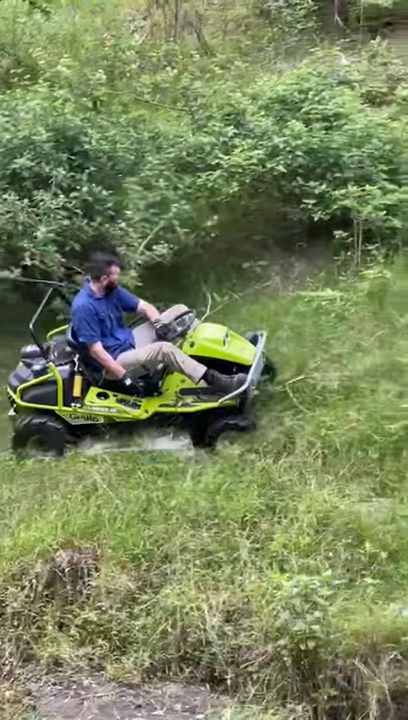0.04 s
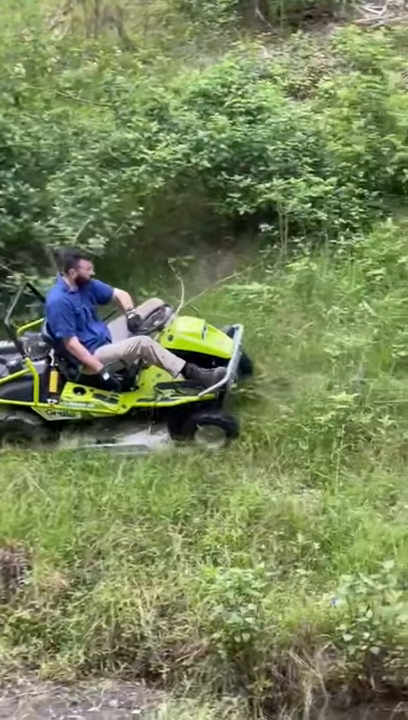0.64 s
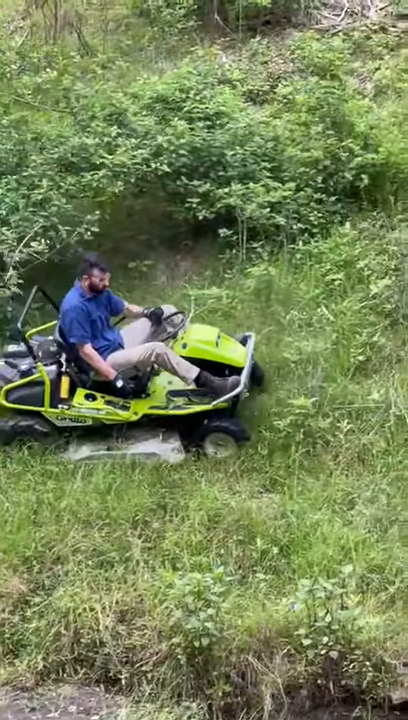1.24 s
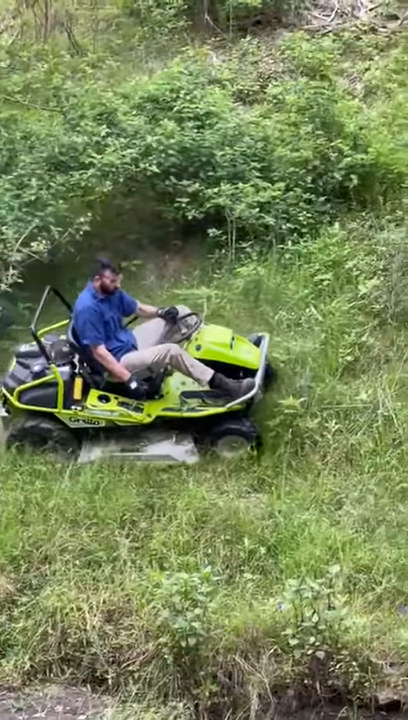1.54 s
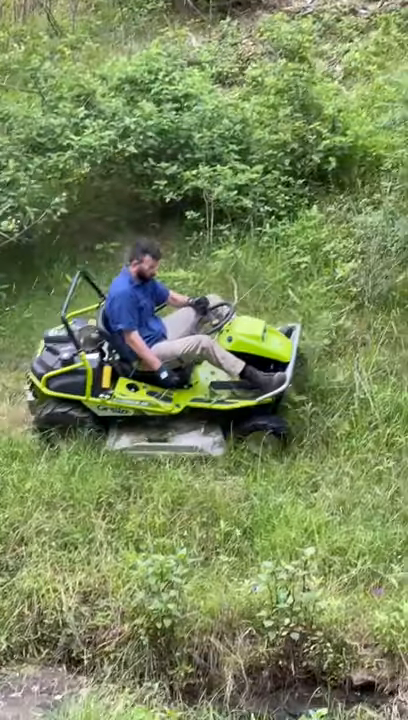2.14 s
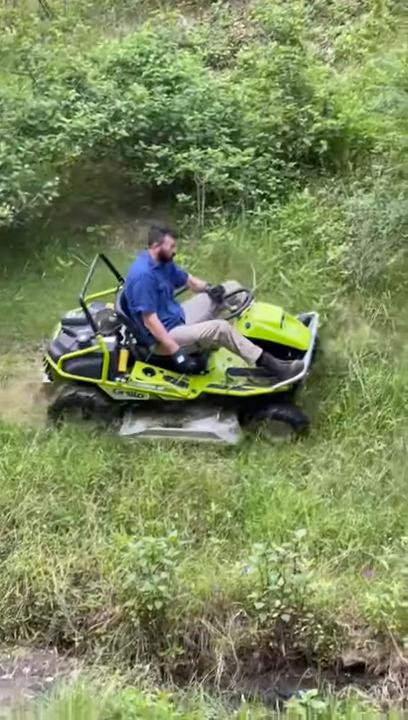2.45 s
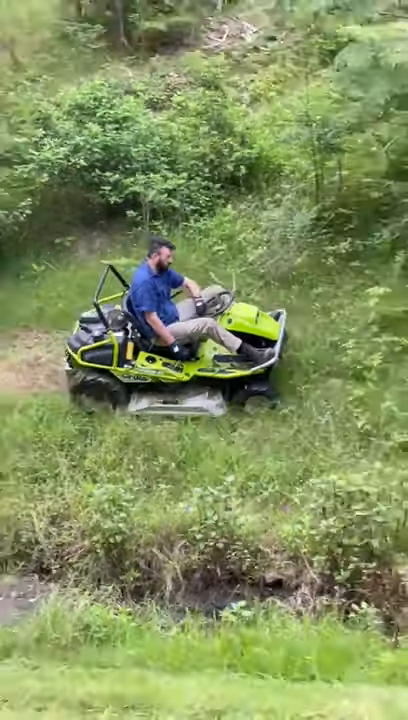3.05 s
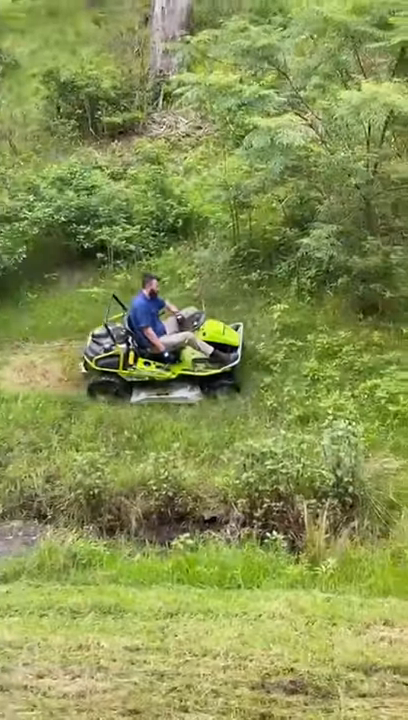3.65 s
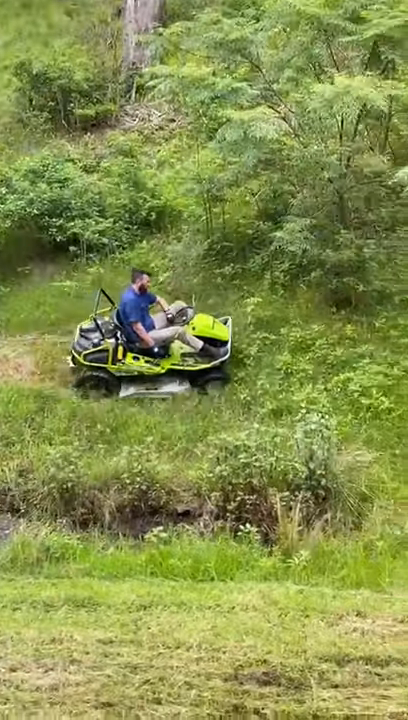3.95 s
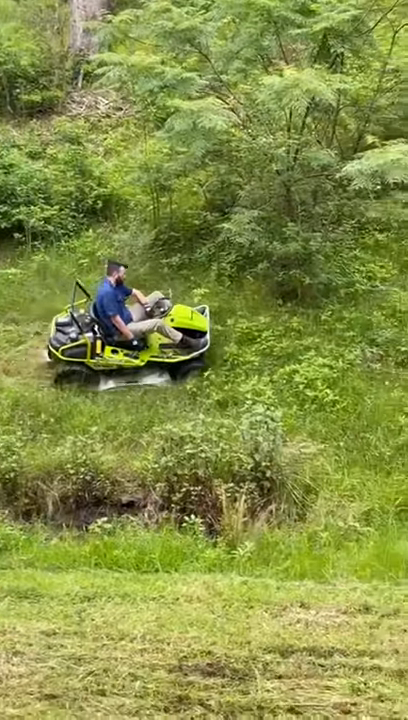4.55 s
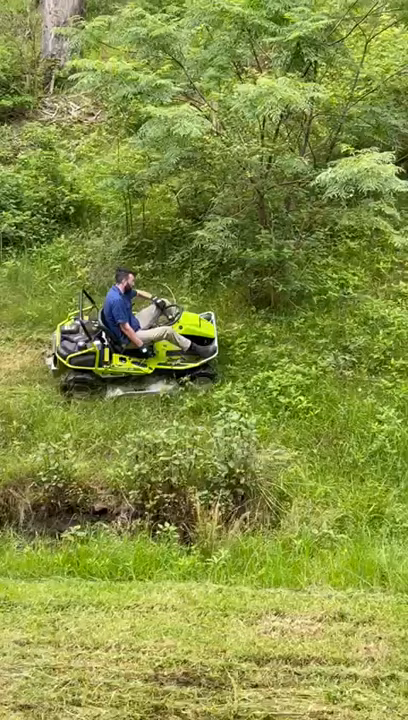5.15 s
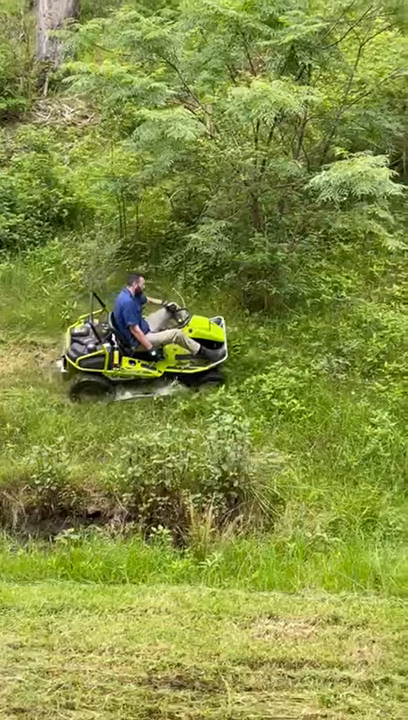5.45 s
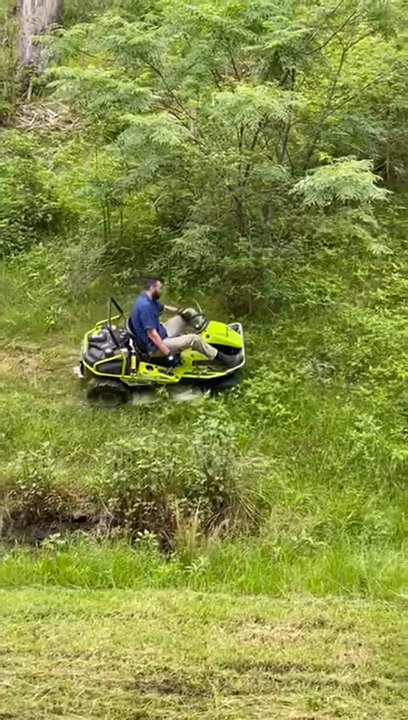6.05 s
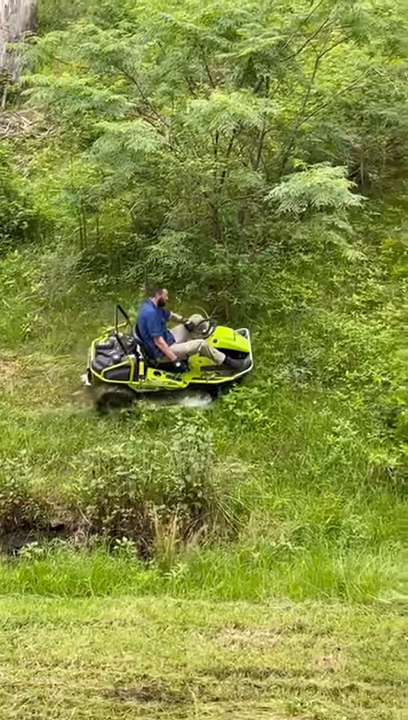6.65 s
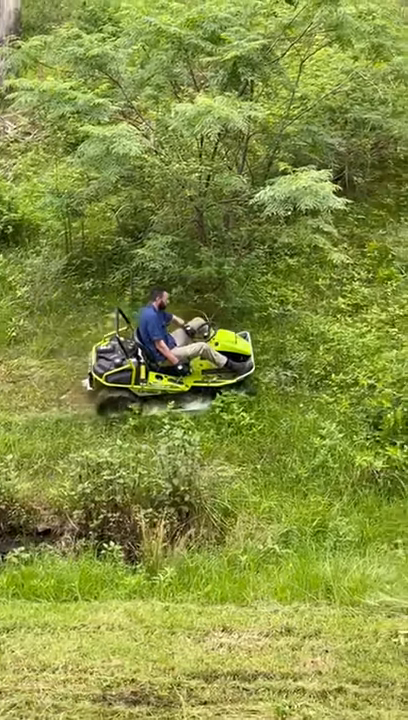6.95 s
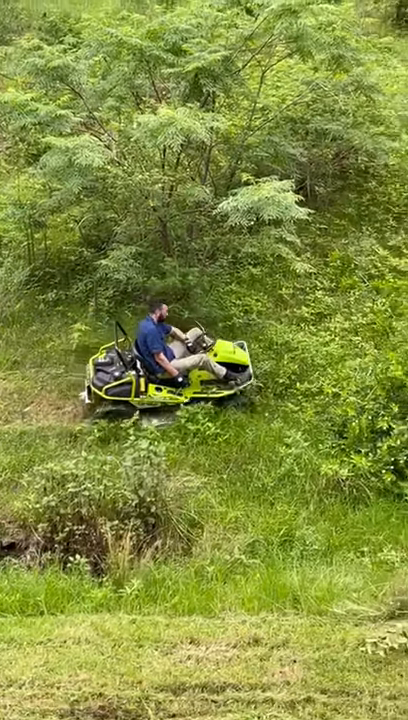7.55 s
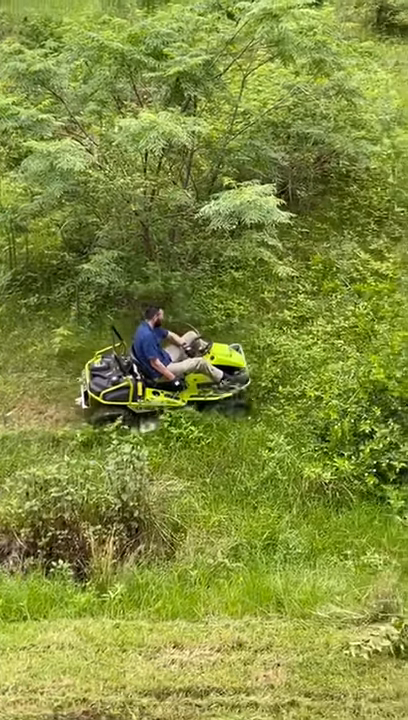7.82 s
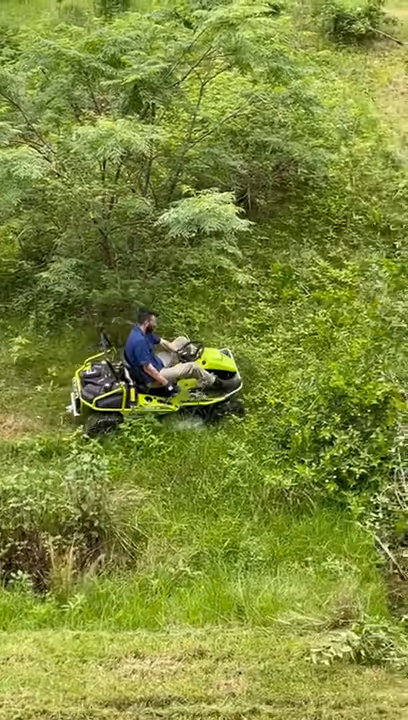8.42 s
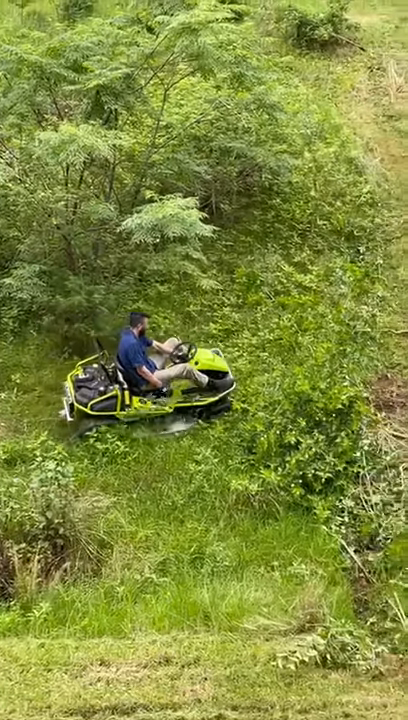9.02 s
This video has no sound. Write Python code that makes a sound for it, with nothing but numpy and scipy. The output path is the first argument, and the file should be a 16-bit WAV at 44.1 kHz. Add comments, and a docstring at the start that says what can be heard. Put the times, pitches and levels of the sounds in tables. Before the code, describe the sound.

A ride-on mower drones steadily some way off, hissing through long grass while sticks crack and clatter in its steel deck.

```python
"""A bank of rough grass, some way off: a ride-on slasher mows, its V-twin governed near full speed.
The exhaust drones; the belt-driven blade hums and booms in its steel deck. Cut stalks hiss and
crackle, sticks snap and clatter, clumps ring the deck, and the blade chops through woody stems.
In thick growth the engine sags a little. The echo off the slope cancels a shifting low band."""
import sys
import numpy as np
from scipy import signal
from scipy.fft import rfft, irfft
from scipy.io import wavfile
from scipy.ndimage import uniform_filter1d

SR = 44100
rng = np.random.default_rng(int(sys.argv[2]) if len(sys.argv) > 2 else 0)


def log_audio(samples):
    """Write samples as a 16-bit WAV file to the path given in sys.argv[1]."""
    # one column per channel
    frames = np.atleast_2d(samples).T
    # limit to full scale, then quantise
    limited = np.clip(frames, -1, 1)
    pcm = np.round(limited * 32767).astype(np.int16)
    wavfile.write(sys.argv[1], SR, pcm)


N = 409248
TIME_S = np.arange(N) / SR
FREQS_HZ = np.maximum(np.arange(N // 2 + 1) * SR / N, 1)

# Engine speed. Each row: time in seconds, four-stroke cycles per second.
CYCLE_RATE_HZ = [(0, 27.75), (.8, 27.42), (1.17, 26.8), (1.7, 27.98), (2.2, 27.73), (3.15, 27.66),
                 (3.45, 27.39), (3.85, 27.75), (4.3, 27.74), (4.55, 28.0), (5.3, 27.76), (5.75, 28.0),
                 (6.4, 28.12), (7.0, 28.04), (7.55, 28.19), (8.4, 27.92), (9.28, 27.72)]
# Grass load on the blade. Each row: time in seconds, load in dB over ordinary mowing.
LOAD_DB = [(0, -3), (.7, -1), (.9, 4), (1.4, -1), (1.9, 1), (2.65, 0), (3.2, 3.5), (3.55, 2), (4.2, 0),
           (4.45, -2), (4.75, -2), (5.1, -3), (7.2, -1.5), (7.55, -1.5), (8.3, -1), (9.28, -1.5)]
# Harmonics. Each row: multiple of the cycle or turning rate, base level in dB.
ENGINE_HARMONICS = [(2, -28), (3, -37.5), (4, -46), (5, -27.5), (6, -32.5), (7, -50), (8, -37), (10, -41.5),
                    (11, -52.5), (13, -41), (14, -63), (17, -52), (18, -51), (19, -64), (20, -47),
                    (21, -70), (23, -39), (24, -54.5), (32, -43), (36, -75), (38, -44), (39, -49),
                    (48, -59)]
BLADE_HARMONICS = [(1, -43.5), (2, -36), (3, -42), (4, -42.5), (6, -45.5), (12, -53), (21, -59), (22, -42)]
# Level curves. Each row: time in seconds, base level in dB.
WHINE_DB = [(0, -35), (1.24, -28.5), (1.8, -33), (3, -30.5), (3.82, -26.5), (4.21, -26.5), (4.52, -30),
            (5.3, -30.5), (5.8, -27), (6.5, -24.5), (8.7, -26), (9.28, -23.5)]  # engine's singing tone
RUSH_DB = [(0, -27), (1.9, -26), (2.5, -26.5), (3.5, -25), (4.4, -25), (9.28, -25)]  # exhaust and cooling air
BOOM_DB = [(0, -38), (.76, -38), (.88, -22.5), (1.05, -29), (1.18, -25), (1.45, -35), (2.55, -38),
           (2.88, -27), (3.0, -28.5), (3.27, -23), (3.5, -27), (3.75, -30), (4.25, -27.5), (4.45, -38),
           (8.4, -40), (9.28, -27.5)]  # deck filling with grass
HISS_DB = [(0.0, -39.5), (0.33, -37), (0.77, -39), (0.95, -32.5), (1.32, -37), (2.4, -36.5), (3.41, -33.5),
           (3.77, -37), (3.98, -35), (4.83, -37), (5.06, -38), (6.12, -38), (6.25, -35.5), (6.74, -37),
           (7.49, -36.5), (9.28, -39)]  # cut grass
# Air resonance under the deck. Each row: time in seconds, centre in Hz, level in dB.
DECK_CAVITY = [(0, 540, -30), (.78, 536, -37), (.88, 525, -24), (1.0, 547, -38), (2.1, 590, -36),
               (2.5, 600, -28), (2.85, 590, -33), (3.2, 586, -28.5), (3.45, 570, -26.5), (3.65, 570, -27.5),
               (4.1, 557, -32), (4.4, 569, -38), (9.28, 560, -39)]
# Steel deck modes. Each row: frequency in Hz, width in Hz, relative gain in dB.
STEEL_MODES = [(560, 240, 7), (1043, 45, 0), (1467, 30, -7.5), (2110, 79, -1.5), (2290, 65, -20)]

# Noise colours. Each row: frequency in Hz, relative density in dB.
RUMBLE_SPECTRUM = [(15, -3), (28, 7), (42, -9), (70, 26), (110, 15), (200, 25), (260, 3), (400, -65.5)]  # stirred air
RUSH_SPECTRUM = [(150, -7.5), (250, -7), (350, -0.5), (430, -1), (510, 4), (630, -0.5), (740, -5.5),
                 (900, -4.5), (1100, -5.5), (1350, -9), (1800, -13), (3000, -20), (8000, -57)]
THRASH_SPECTRUM = [(400, 6), (900, -3), (1550, 7.5), (1800, 2.5), (2400, 3), (2850, -3), (3150, -0.5),
                   (3650, -1.5), (4450, 1), (5500, -7.5), (11000, -59)]  # stalks in the deck
HISS_SPECTRUM = [(1500, -45), (3500, -20), (4500, -1), (5900, 4), (7000, 2), (8500, -7.5), (9500, 4),
                 (10500, 11.5), (11100, 7), (11700, -18), (13000, -108)]
FRACTURE_SPECTRUM = [(1500, -26), (3500, -26), (6000, 22.5), (8500, 20), (10500, 34.5), (12000, 10)]  # a stick's first tick
CRACK_SPECTRUM = [(900, -20), (2000, 8), (2800, 7.5), (3400, 6.5), (4400, 11.5), (6000, 6), (7500, 1),
                  (8800, 5), (10500, 10), (12500, -47)]
KNOCK_SPECTRUM = [(250, -21), (550, -2.5), (780, -1), (1050, 2.5), (1600, 3.5), (2200, 0.5), (3200, -1.5),
                  (6000, -41)]
BITE_SPECTRUM = [(700, -22), (1500, 13), (2800, 6.5), (4400, 1), (6500, 2), (8500, -6), (10800, 8.5),
                 (12000, -20)]
STALK_SPECTRUM = [(1500, -5), (3000, -9), (5500, 0.5), (7500, -1), (9000, 4), (10800, 11.5), (12000, -16)]

# Dry stalks parting. Each row: start in seconds, base level in dB.
DRY_STALKS = [(0.045, -20.5), (.278, -27), (0.298, -20), (.404, -23), (.425, -20), (.517, -21), (.756, -22),
              (0.854, -23), (.969, -19), (.997, -25), (1.098, -25), (1.345, -27), (1.797, -23),
              (1.816, -24), (4.127, -23), (4.184, -14), (4.29, -19), (4.597, -21.5), (4.754, -20),
              (4.852, -20), (5.635, -20), (6.065, -20), (6.201, -24), (6.219, -27), (6.279, -20),
              (6.297, -25), (6.355, -22), (6.98, -21.5), (7.352, -26), (8.187, -26), (8.235, -23),
              (8.638, -22)]
# Louder sticks. Each row: start in seconds, base level in dB, tumbling time in seconds,
# knock offset in dB, tick offset in dB, strongest ring in Hz, ring gain in dB.
STICK_HITS = [(0.334, -18.5, .003, -13, -12, 2850, 9), (.358, -12.5, 0.011, -8, -22, 2800, 8),
              (.478, -7.5, 0.0085, -9, -20, 4050, -1), (0.734, -20, .003, -20, -6, 2820, 13),
              (.774, -14.5, .003, -20, -9, 2860, 10), (.795, -18.5, .005, -1, -5, 2830, 8),
              (.809, -18.5, .006, -1, -14, 2830, 5), (.832, -19, .004, 1, -10, 2800, 14),
              (.873, -16, 0.0088, 1.5, -14, 2930, 6), (.892, -18.5, .004, 3, -14, 2830, 8),
              (.912, -26, 0.0052, 10.5, -20, 2850, 4), (.9547, -21, .004, -14, -14, 2830, 5),
              (.984, -16, 0.012, -3, -10, 2830, 0), (1.0784, -18, .005, -10, -12, 2820, 8),
              (1.1368, -14.5, .005, -18, -24, 2820, 2), (1.1653, -20.5, .012, -11, -23, 2820, 15),
              (1.192, -22, .004, 5, -22, 2800, 12), (1.279, -17.5, .0087, -2, -20, 3950, 1),
              (1.491, -18.5, 0.0033, -10, -8, 2730, 6), (1.915, -26, 0.0055, 10.5, -18, 2820, 8),
              (2.122, -12, 0.0049, -11, -30, 4030, 5), (2.898, -20, .005, 3, -5, 2520, 2),
              (3.072, -20.5, 0.0092, -6, -20, 2890, 17), (3.2027, -14, .006, -5, -19, 4400, 7),
              (3.498, -24, .0046, 8, -8, 2620, 4), (3.7588, -12, .003, -2.5, -9, 6500, -4),
              (3.861, -13, 0.015, 2.5, -21, 2260, 6), (3.926, -9.5, 0.0057, -4, -24, 3530, 2),
              (3.984, -23, .004, -1, -14, 3400, 0), (4.086, -19, .0044, -4, -16, 2840, 8),
              (4.162, -15.5, 0.0036, 3.5, -22, 2580, 10), (4.191, -15, .005, 5, -14, 2290, 16),
              (4.296, -12.5, 0.0017, 0, -9, 2650, 16), (4.694, -20.5, .002, 4, -9, 3000, 5),
              (4.715, -27, 0.0023, 6, -12, 2940, 4), (4.943, -23.5, .004, -1, -16, 2830, 5),
              (6.3751, -19.5, .0035, -5, -1, 2680, -1), (6.39, -23, .005, -5, -12, 2800, 0),
              (8.883, -17, 0.0096, 1, -11, 2590, -5)]
# Heavy clumps. Each row: start in seconds, lowest ring in Hz, its peak in dB, upper rings' base in dB.
CLUMP_HITS = [(.874, 525, -13.5, -31), (.912, 538, -14, -14), (1.283, 604, -15, -22),
              (3.864, 625, -15, -22), (4.193, 615, -26, -19.5), (8.886, 534, -24, -27)]
# Woody stems. Each row: start in seconds, length in seconds, base level in dB.
WOODY_STEMS = [(0.053, 0.6, -26.5), (1.446, 0.45, -24.5), (2.697, 0.41, -24), (4.575, 0.36, -20),
               (6.139, 0.27, -27), (7.208, 0.59, -24), (7.754, 0.89, -31)]

# Notch from the slope's echo. Each row: time in seconds, centre in Hz, depth from 0 to 1.
SLOPE_NOTCH = [(0, 213, 1), (.8, 223, 0.56), (1.4, 214, .4), (2.4, 228, 0.3), (2.9, 390, 0.4),
               (3.5, 365, 0.5), (4.2, 319, 0.17), (6.3, 242, 0.6), (8, 295, 0.26), (9.28, 308, 0.4)]
# Port balance. Each row: frequency in Hz, left minus right in dB.
PORT_BALANCE_DB = [(250, 0), (455, .7), (560, 2.9), (800, 3.3), (1150, 4.0), (1400, 1.8), (1650, 0),
                   (12000, 0)]
# Port phase. Each row: frequency in Hz, left lead in radians.
PORT_LEAD_RAD = [(2200, 0), (2800, .45), (3500, .3), (4100, .72), (4550, 1.7), (4870, 3.14), (5250, 5.7),
                 (5550, 6.28), (6550, 6.3), (7400, 7.5), (7750, 8.0), (8100, 9.3), (9600, 9.45),
                 (10900, 11), (11200, 11.55), (11600, 11.9), (12000, 11.2)]
# Phase flutter and scatter. Each row: frequency in Hz, base depth in dB against the steady sound.
PORT_FLUTTER_DB = [(60, -42), (200, -31), (420, -24), (900, -24), (1900, -28), (2800, -16), (3600, -17),
                   (4500, -14), (4870, -26), (5200, -15), (5900, -28), (7400, -14), (8800, -32),
                   (10500, -17)]
# Midrange swing. Each row: time in seconds, extra left minus right in dB.
SWING_DB = [(0, 0), (3.9, -0.5), (4.4, 3.5), (4.6, 3), (4.9, 6), (5.4, 6.5), (5.65, -0.5), (6.3, -1),
            (6.8, 0), (9.28, -1)]
# Band that swings. Each row: frequency in Hz, share from 0 to 1.
SWING_BAND = [(460, 0), (620, 1), (850, 0.82), (1200, 0.77), (1400, 0.3), (1550, 0)]

BELT_RATIO = 1.832  # blade turns per engine cycle
DECK_RING_HZ = 2740  # steel under flying debris


def from_db(db):
    """Decibels to gain."""
    return 10 ** (np.asarray(db) / 20)


def unit_rms(x):
    """Scale to rms 1."""
    return x / np.sqrt(np.mean(x ** 2) + 1e-20)


def over_time(rows):
    """A curve's value columns at every sample."""
    times_s, *columns = np.transpose(rows)
    return [np.interp(TIME_S, times_s, column) for column in columns]


def over_hz(rows):
    """A table's value at every FFT bin."""
    hz, value = np.transpose(rows)
    return np.interp(np.log(FREQS_HZ), np.log(hz), value)


def coloured(x, spectrum):
    """Apply a spectrum; white input keeps its power."""
    return irfft(rfft(x) * unit_rms(from_db(over_hz(spectrum))), N)


def white():
    """White noise, rms 1."""
    return rng.standard_normal(N)


def drift(rate_hz, step=40):
    """Smooth random wander, rms 1."""
    r = np.exp(-2 * np.pi * step * rate_hz / SR)
    noise = rng.standard_normal(N // step + 2002)
    slow = signal.lfilter([1], [1, -2 * r, r * r], noise)[2000:]
    return np.interp(np.arange(N) / step, np.arange(len(slow)), unit_rms(slow))


def resonator(hz, width_hz):
    """Two-pole band-pass coefficients, peak gain 1."""
    r = np.exp(-np.pi * width_hz / SR)
    return np.array([1, 0, -1]) * (1 - r * r) / 2, [1, -2 * r * np.cos(2 * np.pi * hz / SR), r * r]


def resonate(x, hz, width_hz):
    """Steady resonance."""
    return signal.lfilter(*resonator(hz, width_hz), x)


def moving_resonance(x, hz, width_hz, block=512):
    """Resonance centred on the curve hz."""
    band, state = np.zeros(N), np.zeros(2)
    for i in range(0, N, block):
        band[i:i + block], state = signal.lfilter(*resonator(hz[i], width_hz), x[i:i + block], zi=state)
    return band


def evened(x, window=6000):
    """Level slow swells, keep the quick throb; rms 1."""
    return x / np.sqrt(uniform_filter1d(x ** 2, window) + 1e-20)


def puffs(turns, duty):
    """One smooth swell per turn, about duty turns long."""
    return np.exp(-(np.sin(np.pi * turns) / (np.pi * duty)) ** 2)


def tones(turns, harmonics, waver_db, jitter_turns):
    """Harmonics of a rotation with wavering levels and shared timing jitter."""
    turns = turns + jitter_turns * drift(9.6)
    out = np.zeros(N)
    for order, db in harmonics:
        amplitude = np.sqrt(2) * from_db(db + waver_db * drift(3.7))
        out += amplitude * np.sin(2 * np.pi * (order * turns + rng.random()))
    return out


def blow(start_s, rise_s, t60_s, hold_s=0):
    """Sample span and envelope of an impact: rise, hold, decay."""
    start = int(start_s * SR)
    age_s = TIME_S[:min(SR // 2, N - start)]
    rise = 1 - np.exp(-age_s / rise_s)
    decay = from_db(-60 * np.maximum(age_s - hold_s, 0) / t60_s)
    return slice(start, start + len(age_s)), rise * decay


def snaps(per_s, spread_db):
    """Random snapping impulses, a few much louder; rms 1."""
    sizes = from_db(spread_db * np.minimum(rng.exponential(1, N), 4)) * rng.choice([-1, 1], N)
    return unit_rms(sizes * (rng.random(N) < per_s / SR))


def slope_echo(x):
    """The echo off the slope cancels a low band that shifts as the mower drives on."""
    hz, depth = over_time(SLOPE_NOTCH)
    return x - depth * moving_resonance(x, hz, width_hz=60)


def stereo_ports(x, flutter_hz=60, sway_db=-3, scatter_db=-2):
    """Two microphone ports: steady level difference, fluttering phase, faint scatter off foliage."""
    half_balance = from_db(over_hz(PORT_BALANCE_DB) / 2)
    flutter = from_db(over_hz(PORT_FLUTTER_DB))
    _, fade = blow(0, rise_s=0.0027, t60_s=0.048)
    echoes = rng.standard_normal((2, len(fade))) * fade / np.sqrt(np.sum(fade ** 2))
    response = np.array([half_balance, np.exp(-1j * over_hz(PORT_LEAD_RAD)) / half_balance])
    ports = rfft(x) * response / np.sqrt(1 + flutter ** 2)
    ports *= 1 + from_db(scatter_db) * flutter * rfft(echoes, N)
    # a quadrature share advances one port and delays the other
    sway = from_db(sway_db) * unit_rms(np.tanh(2 * drift(flutter_hz))) * np.array([[1], [-1]])
    return irfft(ports, N) + sway * irfft(1j * flutter * ports, N)


def swing_left(ports, left_share=0.44, lag_rad_per_db=0.11):
    """For a while the midrange grows on the left, fades and lags on the right."""
    swing_db, = over_time(SWING_DB)
    band = signal.hilbert(irfft(rfft(ports) * over_hz(SWING_BAND), N))
    left = from_db(left_share * swing_db)
    right = from_db((left_share - 1) * swing_db) * np.exp(-1j * lag_rad_per_db * swing_db)
    return ports + np.real(band * (np.array([left, right]) - 1))


def stalk_ticks(gain_db=1.5):
    """Each dry stalk parts in one short, bright burst."""
    envelope = np.zeros(N)
    for start_s, db in DRY_STALKS:
        span, fade = blow(start_s, rise_s=0.00018, t60_s=0.02, hold_s=0.001)
        envelope[span] += fade * from_db(db + gain_db)
    return coloured(white() * envelope, STALK_SPECTRUM)


def stems(bites_per_s=50.8, spread_db=0.5, ring_db=2, gain_db=1):
    """A woody stem feeds in, one bite per blade turn: a dry rattle that swells and fades."""
    envelope = np.zeros(N)
    for start_s, length_s, db in WOODY_STEMS:
        for age_s in np.arange(0, length_s, 1 / bites_per_s):
            span, fade = blow(start_s + age_s, rise_s=0.00063, t60_s=0.028)
            feed = np.sqrt(np.sin(np.pi * age_s / length_s))
            envelope[span] += fade * feed * from_db(db + gain_db + spread_db * rng.standard_normal())
    bites = white() * envelope
    ring = from_db(ring_db) * resonate(bites, DECK_RING_HZ, width_hz=77)
    return coloured(bites + ring, BITE_SPECTRUM)


def clumps(soft_hz=1250):
    """Clumps ring the deck; packed grass shifts the lowest mode and damps those above soft_hz."""
    out = np.zeros(N)
    for start_s, lowest_hz, lowest_db, upper_db in CLUMP_HITS:
        upper_modes = [(hz, upper_db + db) for hz, _, db in STEEL_MODES[1:]]
        for hz, db in [(lowest_hz, lowest_db)] + upper_modes:
            rolloff = min(1, soft_hz / hz)
            span, fade = blow(start_s, rise_s=0.0018, t60_s=0.12 * rolloff ** 2)
            ring = np.sin(2 * np.pi * (hz * TIME_S[span] + rng.random()))
            out[span] += rolloff * from_db(db) * fade * ring
    return out


def twig_hits(load_db, per_s=5.4, tumble_s=0.01, knock_db=1.5, tick_db=-11, ring_db=5):
    """Small twigs met at random, more under load; rows as in STICK_HITS."""
    hits = np.flatnonzero(rng.random(N) < per_s * from_db(1.3 * load_db) / SR)
    level_db = -28.5 + 2.5 * rng.uniform(-0.55, 1, N)
    ring_hz = rng.uniform(2300, 6680, N)
    return [(TIME_S[i], level_db[i], tumble_s, knock_db, tick_db, ring_hz[i], ring_db) for i in hits]


def sticks(load_db, tick_gain_db=7.5, crack_gain_db=-8, knock_gain_db=-10):
    """A stick breaks with a tick; its pieces crack and knock round the deck, bigger ones longer."""
    ticks, cracks, knocks = np.zeros((3, N))
    splinters = unit_rms(white() + 1.3 * snaps(per_s=1800, spread_db=2.5))
    pieces, fracture = white(), white()
    mean_db = np.mean([row[1] for row in STICK_HITS])
    hits = list(STICK_HITS) + twig_hits(load_db)
    for start_s, db, tumble_s, knock_db, tick_db, ring_hz, ring_db in hits:
        clatter_t60_s = 0.083 * from_db(0.19 * (db - mean_db))
        span, fade = blow(start_s, rise_s=0.0004, t60_s=clatter_t60_s, hold_s=tumble_s)
        _, snap = blow(start_s, rise_s=0.00005, t60_s=0.026)
        clatter = splinters[span] * fade * from_db(db)
        side_rings = sum(resonate(clatter, hz, width_hz=59) for hz in rng.uniform(2700, 7070, size=5))
        main_ring = from_db(ring_db) * resonate(clatter, ring_hz, width_hz=90)
        ticks[span] += fracture[span] * snap * from_db(db + tick_db)
        cracks[span] += clatter + 0.2 * side_rings + main_ring
        knocks[span] += pieces[span] * fade * from_db(db + knock_db)
    knocks += sum(from_db(db) * resonate(knocks, hz, width_hz) for hz, width_hz, db in STEEL_MODES)
    return (from_db(tick_gain_db) * coloured(ticks, FRACTURE_SPECTRUM)
            + from_db(crack_gain_db) * coloured(cracks, CRACK_SPECTRUM)
            + from_db(knock_gain_db) * coloured(knocks, KNOCK_SPECTRUM))


def cutting(blade_turns, load_db, snap_share=0.56, rasp_db=-45, thrash_db=-33, hiss_gain_db=2.5):
    """Grass is cut in tufts, pulsing at each blade sweep; flung stalks make the steel rasp."""
    hiss_db, = over_time(HISS_DB)
    sweep, tufts = puffs(blade_turns, duty=0.27), drift(8.7)
    stalks = unit_rms((white() + snap_share * snaps(per_s=900, spread_db=1.5)) * (1 + 0.14 * sweep))
    grass = unit_rms((white() + snap_share * snaps(per_s=1100, spread_db=4.5)) * (1 + 0.47 * sweep))
    rasp = unit_rms(resonate(stalks, DECK_RING_HZ, width_hz=260)) * from_db(rasp_db + 1.9 * load_db)
    thrash = coloured(stalks * from_db(thrash_db + 0.76 * load_db + 0.24 * tufts), THRASH_SPECTRUM)
    hiss = coloured(grass * from_db(hiss_db + hiss_gain_db + 1.82 * tufts), HISS_SPECTRUM)
    return rasp + thrash + hiss


def deck(blade_turns, load_db, rumble_db=-40, cavity_width_hz=190):
    """The blade hums; grass makes the deck boom and roar hollowly over a rumble of stirred air."""
    boom_db, = over_time(BOOM_DB)
    cavity_hz, cavity_db = over_time(DECK_CAVITY)
    hum = tones(blade_turns, BLADE_HARMONICS, waver_db=3.4, jitter_turns=0.014) * from_db(0.45 * load_db)
    boom = evened(resonate(resonate(white(), hz=160, width_hz=19), hz=148, width_hz=65))
    cavity = moving_resonance(white(), cavity_hz, cavity_width_hz)
    cavity = evened(moving_resonance(cavity, cavity_hz, cavity_width_hz))
    rumble = from_db(rumble_db + 0.42 * load_db) * coloured(white(), RUMBLE_SPECTRUM)
    return hum + from_db(boom_db) * boom + from_db(cavity_db) * cavity + rumble


def wheel_drive(hz=584, level_db=-36):
    """Unsteady gear whine."""
    whine = np.sqrt(2) * np.sin(2 * np.pi * hz * TIME_S + 0.7 * drift(2))
    return from_db(level_db + 0.37 * drift(11)) * whine


def air_rush(cycles, blade_turns, load_db, firing_gap_cycles=5 / 8):
    """Exhaust gas and fanned air swell at each uneven firing of the right-angle V and each blade turn."""
    rush_db, = over_time(RUSH_DB)
    firings = puffs(cycles, duty=0.08) + puffs(cycles - firing_gap_cycles, duty=0.08)
    swell = 1 + 0.33 * firings + 0.25 * puffs(blade_turns, duty=0.2)
    return from_db(rush_db + 0.35 * load_db) * coloured(white() * unit_rms(swell), RUSH_SPECTRUM)


def engine(cycles, load_db):
    """Exhaust and crankcase drone, swelling as the governor opens; a whine at 8 times crank speed."""
    whine_db, = over_time(WHINE_DB)
    drone = tones(cycles, ENGINE_HARMONICS, waver_db=0.68, jitter_turns=0.00036)
    whine = np.sqrt(2) * np.sin(2 * np.pi * 16 * cycles + 0.06 * drift(10))
    return from_db(0.17 * load_db) * drone + from_db(whine_db + 1.9 * drift(19)) * whine


def scene():
    """The engine turns the blade through a slightly slipping belt; machine and cutting mix to stereo."""
    cycle_hz, = over_time(CYCLE_RATE_HZ)
    load_db, = over_time(LOAD_DB)
    cycles = np.cumsum(cycle_hz) / SR
    slip_turns = 0.0713 * drift(0.712)
    blade_turns = BELT_RATIO * cycles + slip_turns
    machine = engine(cycles, load_db) + wheel_drive()
    machine += air_rush(cycles, blade_turns, load_db) + deck(blade_turns, load_db)
    growth = cutting(blade_turns, load_db) + sticks(load_db) + clumps() + stalk_ticks() + stems()
    return swing_left(stereo_ports(slope_echo(machine) + growth))


def record(dry, ceiling=0.9, cutoff_hz=12200):
    """Soft peak limit, then a steep low-pass."""
    rounded = dry / (1 + (dry / ceiling) ** 8) ** (1 / 8)
    return signal.sosfilt(signal.ellip(12, 0.1, 100, cutoff_hz, fs=SR, output="sos"), rounded)


dry = scene()
out = record(dry)
log_audio(out)
```